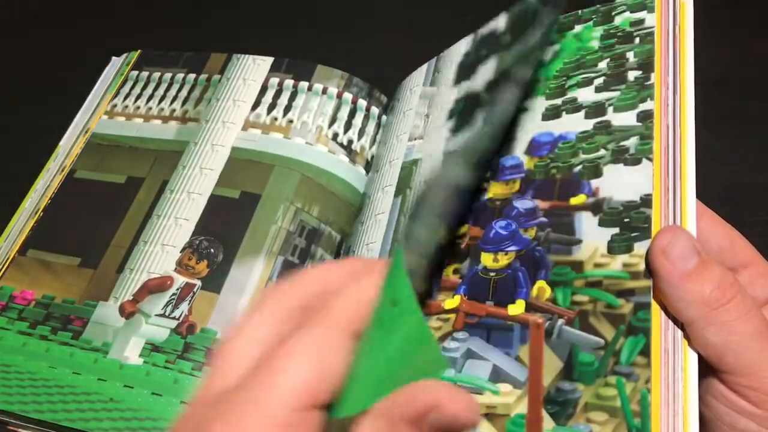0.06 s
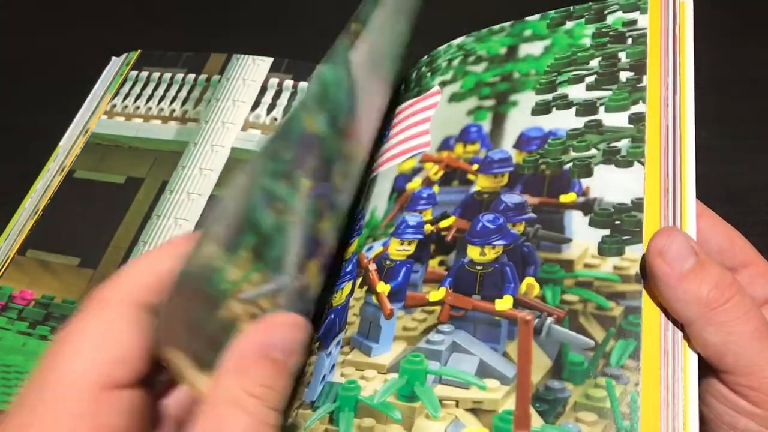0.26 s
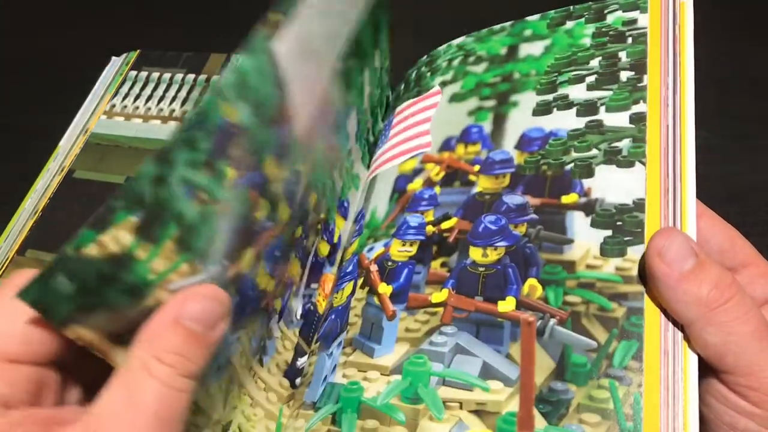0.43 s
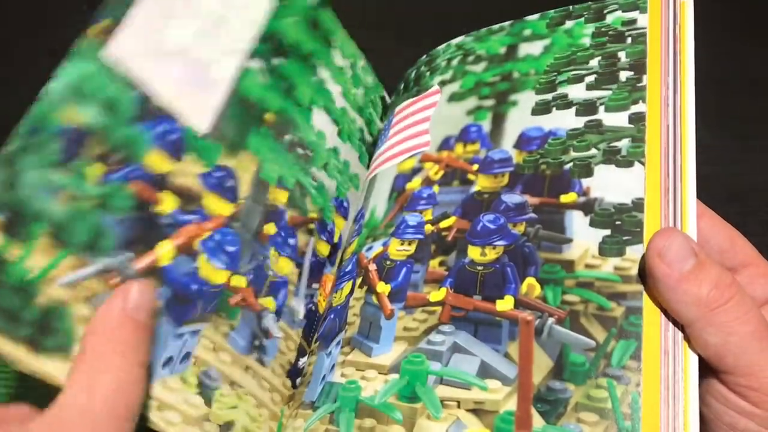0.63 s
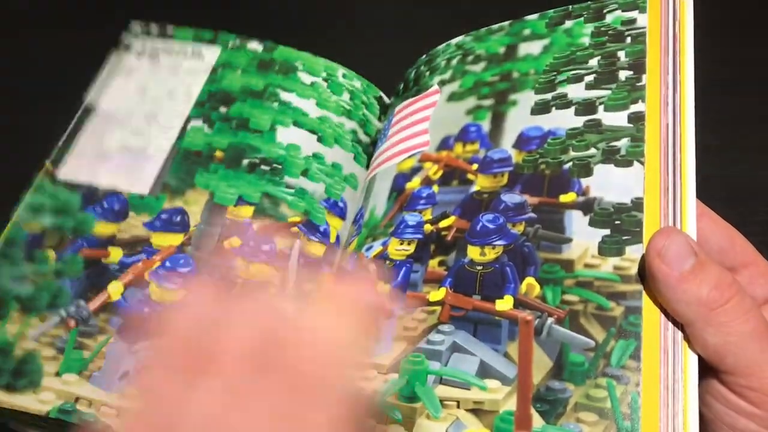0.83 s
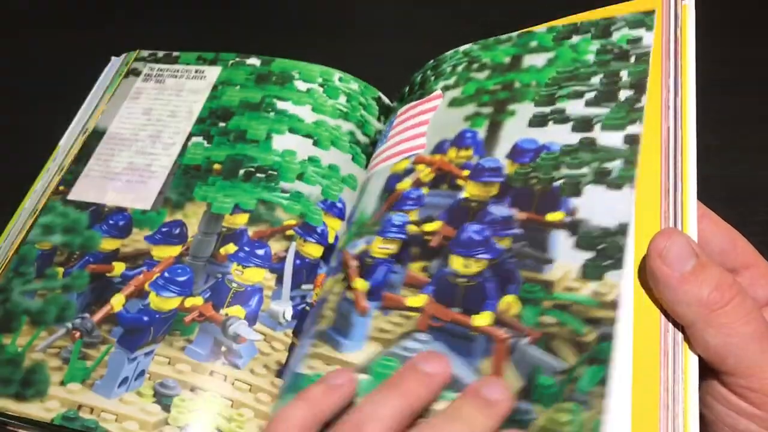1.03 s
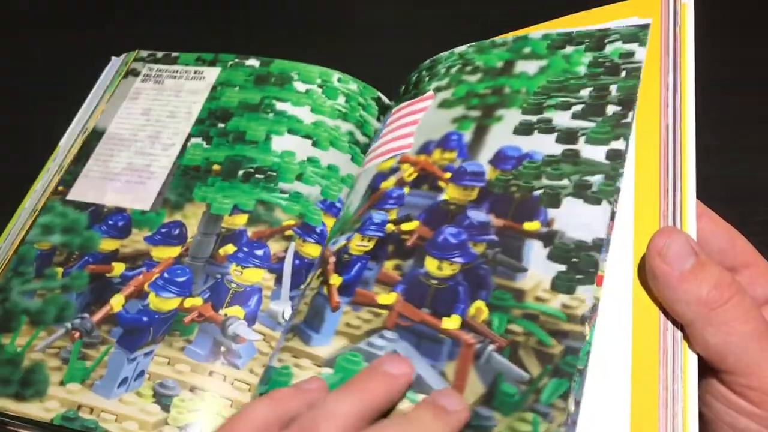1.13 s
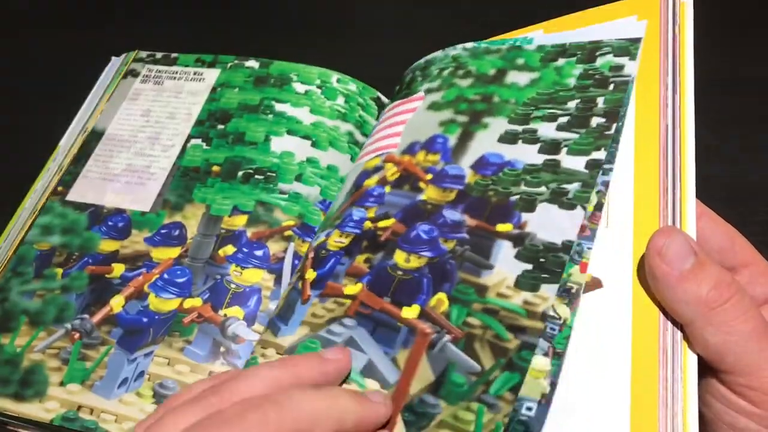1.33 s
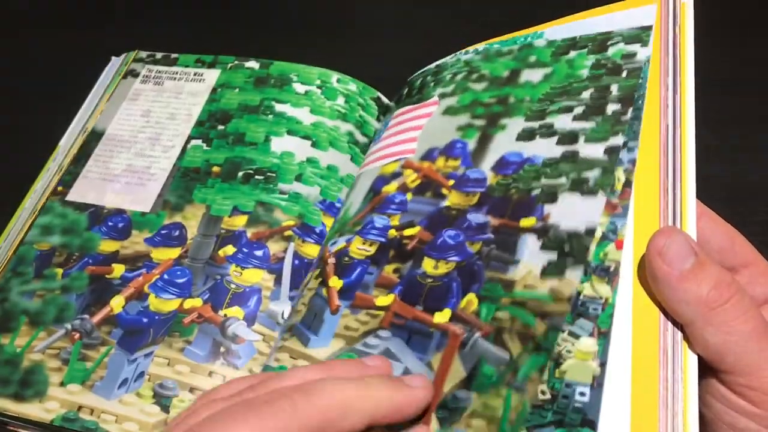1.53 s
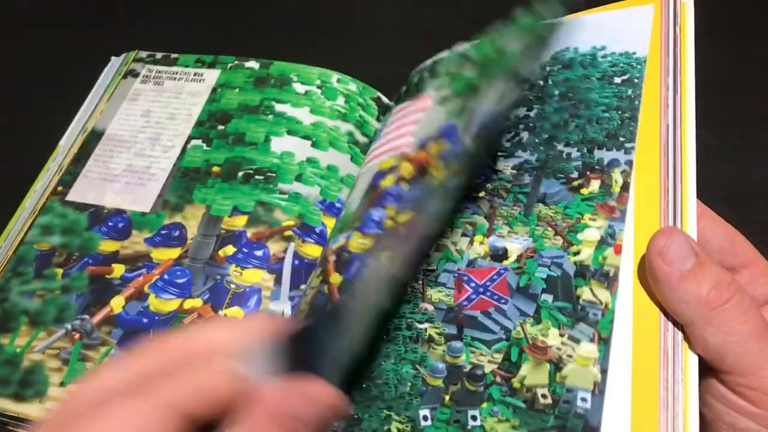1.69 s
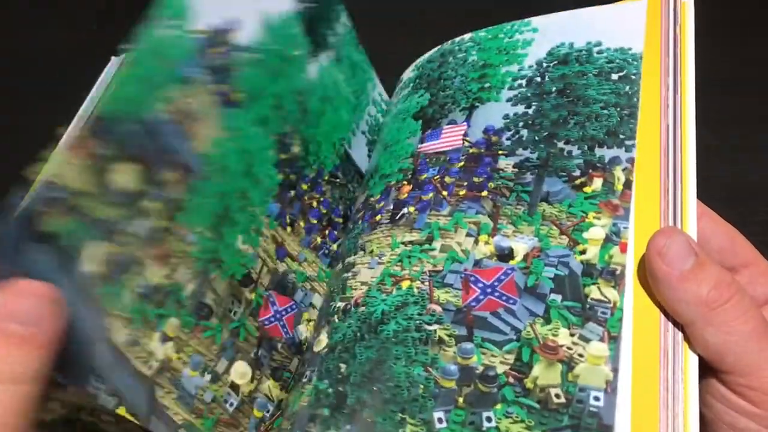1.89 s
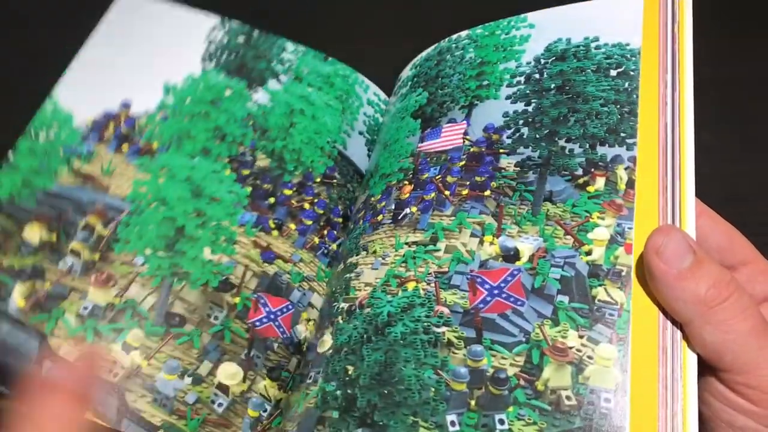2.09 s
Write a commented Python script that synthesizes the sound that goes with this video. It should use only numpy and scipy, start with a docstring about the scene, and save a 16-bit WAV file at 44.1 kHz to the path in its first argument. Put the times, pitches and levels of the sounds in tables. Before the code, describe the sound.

Book page turning close up: a crisp papery crack, hollow flutters, finger rubs, a soft second flick

```python
"""A faint papery hiss comes first, then a sharp snap: two glossy pages of a large book turned in a small room.
The first sheet slides up, snaps free, buckles with hollow pops and lands; fingers slide over the next page,
catch its edge and lift it with soft thumps, and it flicks over and wobbles.
Snaps, slides and air are shaped noise, pops are tones amid noise, thumps are low tones, and wobble is noise
through page resonances; a short room tail, faint steady noise and mains hum lie around them."""
import sys
import numpy as np
from scipy import signal
from scipy.fft import rfft, irfft, next_fast_len
from scipy.io import wavfile
from scipy.ndimage import uniform_filter1d, map_coordinates

SR = 44100
rng = np.random.default_rng(int(sys.argv[2]) if len(sys.argv) > 2 else 0)


def dump(signal):
    """Clip the signal to [-1, 1] and save it as 16-bit WAV at the path in sys.argv[1]."""
    limited = np.clip(np.atleast_2d(signal).T, -1, 1)
    pcm = np.round(limited * 32767).astype(np.int16)
    wavfile.write(sys.argv[1], SR, pcm)


N = 94815

# crisp snaps of the sheet: start_s, level_db, t60_s, bright_hz, tilt_db_per_octave
SNAPS = [(0.0176, -49.5, 0.026, 3310, 1.5), (.159, -48.5, 0.031, 1800, -0.5),
         (0.2166, -39, 0.034, 3700, -0.5), (0.2311, -23.5, 0.071, 2880, 3.5),
         (0.2356, -10, 0.0048, 6140, 9.5), (0.24, -22.5, 0.015, 6140, 6.5), (0.461, -48, 0.02, 5600, -3),
         (.481, -33, 0.012, 4350, -5.5), (0.502, -29, 0.0155, 3900, -2.5),
         (0.6375, -31.5, 0.0072, 2800, -2.5), (1.0082, -40.5, 0.003, 3400, -1),
         (1.9958, -36.5, 0.013, 2210, -2.5), (2.001, -46, 0.084, 2320, 1.5)]
# overall colour of a snap: freq_hz, gain_db
SNAP_COLOUR = [(100, 3.5), (600, -6.5), (1100, -1.5), (1700, 3), (3400, -1), (4700, -5), (5600, -1.5),
               (6700, -4), (7700, -13.5), (8900, -2), (10300, -10), (15500, -13)]
SNAP_RISE_S = 0.00054  # time constant of the swell before the crack
SNAP_PEAK_DB, SNAP_PEAK_OCTAVES = 8.5, 0.24  # bright band: boost before colouring, half width


def snaps():
    """Tension builds up and lets go in a broad crack with one bright band."""
    out = np.zeros(N)
    for start_s, level_db, t60_s, bright_hz, tilt_db in SNAPS:
        def bright_band(hz):
            octaves_away = np.log2((hz + 1) / bright_hz)
            return amp(SNAP_PEAK_DB * np.exp(-(octaves_away / SNAP_PEAK_OCTAVES) ** 2))

        t = clock() - start_s
        fall = np.where(t < 0, -t / SNAP_RISE_S, np.log(1000) * t / t60_s)
        envelope = np.exp(-np.minimum(fall, 20))
        crack = filtered(noise(), bright_band)
        out += amp(level_db) * envelope * coloured(crack, SNAP_COLOUR, tilt_db)
    return out


# hollow buckles of the sheet: start_s, level_db, pitch_hz, t60_s, crumple_db (relative to the tone)
POPS = [(0.238, -40, 277, 0.068, 4), (0.245, -21.5, 1940, 0.016, 6), (0.248, -23.5, 1983, 0.031, 2),
        (0.265, -45.5, 1880, 0.051, 13.5), (0.425, -49.5, 1498, 0.074, 6.5), (.430, -40.5, 815, 0.04, 5.5),
        (.480, -34, 680, 0.024, -6.5), (.5022, -24.5, 585.5, 0.059, -38), (0.5193, -40, 1146, 0.022, 9),
        (.525, -42.5, 710, 0.029, 3.5), (.532, -41, 864, 0.039, 5), (.558, -49, 630, .022, 7),
        (0.592, -53, 570, .03, -16), (0.699, -57, 851, .05, 9), (1.156, -46.5, 870, 0.067, -4.5),
        (1.851, -47, 632, 0.026, 0.5), (1.999, -50.5, 597, 0.045, 3.5), (2.063, -52.5, 713, 0.049, 5),
        (2.079, -47.5, 600, 0.08, -5)]
# spectrum of the crumple around each pop: pitch_multiple, gain_db
CRUMPLE = [(.1, -19.5), (.4, 3.5), (.7, 3.5), (1, 5.5), (1.45, 2), (2.2, -8), (5, -47.5)]
POP_RISE_S = 0.00096  # time constant


def pops():
    """Each buckle rings one damped bending mode amid a cluster of others."""
    out = np.zeros(N)
    for start_s, level_db, pitch_hz, t60_s, crumple_db in POPS:
        t, envelope = struck(start_s, POP_RISE_S, t60_s)
        tone = np.sqrt(2) * np.sin(2 * np.pi * pitch_hz * t)
        cluster = unit(filtered(noise(), lambda hz: amp(along(CRUMPLE, hz / pitch_hz))))
        out += amp(level_db) * envelope * (tone + amp(crumple_db) * cluster)
    return out


# soft thumps as a page lifts or lands: start_s, level_db (before doubling), pitch_hz, t60_s
THUMPS = [(0.502, -38, 158, 0.039), (1.689, -44.5, 254, 0.056), (1.6988, -32.5, 167, 0.021),
          (1.734, -31.5, 236, 0.017), (1.744, -29.5, 224, 0.014), (1.772, -49.5, 240, 0.054),
          (1.835, -46.5, 79, 0.053), (1.997, -51.5, 167, 0.044)]
THUMP_RISE_S = 0.0035  # time constant


def thumps():
    """The whole page flexes and pushes air in a short, low, damped tone."""
    out = np.zeros(N)
    for start_s, level_db, pitch_hz, t60_s in THUMPS:
        t, envelope = struck(start_s, THUMP_RISE_S, t60_s)
        out += 2 * amp(level_db) * envelope * np.sin(2 * np.pi * pitch_hz * t)
    return out


# paper and skin sliding: start_s, length_s, level_db (before roughness and resonance), rise_s,
# release_s (to fall 17 dB), tilt_db_per_octave
SLIDES = [(-.02, 0.29, -62.5, .01, 0.013, 0), (0.148, 0.14, -58.5, 0.003, 0.018, 2.5),
          (0.221, .006, -36.5, 0.0073, .005, 1), (.25, 0.056, -54, .005, 0.16, 0),
          (0.39, .012, -44.5, 0.014, 0.014, -6.5), (0.507, 0.043, -54.5, 0.0071, 0.042, -1),
          (0.624, 0.025, -53, 0.006, 0.017, 1.5), (0.705, 0.015, -63.5, 0.01, 0.011, 3.5),
          (1.006, .24, -55, 0.0045, 0.17, -0.5), (1.053, 0.059, -55, 0.048, 0.19, 6.5),
          (1.28, 0.068, -54, 0.021, 0.015, -3.5), (1.365, .026, -48.5, 0.01, 0.012, 1),
          (1.405, 0.027, -45.5, 0.022, 0.029, 0), (1.426, 0.2, -64, 0.0088, 0.049, 0.5),
          (1.514, 0.0193, -54.5, 0.012, 0.005, 2.5), (1.65, 0.16, -56.5, 0.061, 0.11, 0),
          (1.911, 0.198, -68.5, 0.018, 0.027, 1.5), (2.006, 0.025, -51, .008, 0.015, 7.5)]
# overall colour of the hiss: freq_hz, gain_db
SLIDE_COLOUR = [(200, -13.5), (450, -15.5), (700, -7.5), (1200, -7), (2400, -8), (3400, -8.5),
                (5000, -15.5), (6300, -15), (10400, -21.5), (13000, -17), (15800, -24)]
GRAINS_PER_S, GRAIN_SHARE = 2500, 0.27  # mean rate of slips, their share of the power before colouring
ROUGH_DB, ROUGH_PER_S = 0.5, 150  # random level drift: depth, new values per second


def slides():
    """Dense tiny slips under each stroke make a rough hiss."""
    out, t = np.zeros(N), clock()
    share = np.clip(GRAIN_SHARE, 0, 1)
    for start_s, length_s, level_db, rise_s, release_s, tilt_db in SLIDES:
        slips = unit(noise() * (rng.random(N) < GRAINS_PER_S / SR))
        mix = np.sqrt(share) * slips + np.sqrt(1 - share) * noise()
        hiss = coloured(mix, SLIDE_COLOUR, tilt_db)
        fade_in = np.clip((t - start_s) / rise_s, 0, 1)
        fade_out = np.exp(-2 * np.maximum(t - start_s - length_s, 0) / release_s)
        out += amp(level_db) * hiss * fade_in * fade_out
    drift = map_coordinates(rng.standard_normal(N // 20), [t * ROUGH_PER_S])
    return out * amp(ROUGH_DB * drift)


CRINKLE_DB = 2.5  # depth of the brief, narrow patches in the paper's hiss


def crinkled(x):
    """The hiss is mottled by brief, narrow random gains over time and frequency."""
    spectrum = signal.stft(x, nperseg=256)[2]
    field = rng.standard_normal(spectrum.shape)
    field = uniform_filter1d(field, size=4, axis=0)  # spread over frequency
    field = uniform_filter1d(field, size=2, axis=1)  # spread over time
    patches = unit(amp(CRINKLE_DB * unit(field)))
    return signal.istft(spectrum * patches, nperseg=256)[1][:N]


# the flat page's resonance under a rubbing finger
PRESSED_HZ, PRESSED_WIDTH_HZ, PRESSED_DB = 872.5, 46, 4.5


def rubbing():
    """The slides, mottled and coloured by the pressed page's damped mode."""
    def pressed_page(hz):
        return 1 + amp(PRESSED_DB) * resonance(hz, PRESSED_HZ, PRESSED_WIDTH_HZ)

    return filtered(crinkled(slides()), pressed_page)


# lasting resonances of the loose sheet: pitch_hz, width_hz, level_db
SHEET = [(264.8, 14, -2.5), (589.6, 33, 1), (657, 62, -4.5), (874, 27, -4.5)]


def sheet(x):
    """x through the page's damped modes, summed with alternating sign."""
    def modes(f):
        return sum((-1) ** k * amp(level_db) * resonance(f, pitch_hz, width_hz)
                   for k, (pitch_hz, width_hz, level_db) in enumerate(SHEET))

    return filtered(x, modes)


# how hard the loose sheet wobbles: time_s, level_db
WOBBLE = [(0, -85), (.3, -49.5), (.37, -62), (.46, -53.5), (.6, -65), (0.671, -53), (.75, -76),
          (1.0, -88.5), (1.018, -54), (1.12, -98), (1.157, -56.5), (1.26, -69.5), (1.32, -58),
          (1.39, -67.5), (1.48, -69.5), (1.66, -84.5), (1.85, -60), (1.94, -78), (2.07, -53), (2.15, -78)]


def wobble():
    """Handling keeps the sheet's resonances stirred: noise through them at a moving level."""
    level_db = np.interp(clock(), *np.transpose(WOBBLE))
    return amp(level_db) * unit(sheet(noise()))


# air pushed by the swinging page: middle_s, half_length_s (to 1/e), level_db
SWINGS = [(0.232, 0.32, -62), (1.937, 0.16, -70)]
# colour of the low whoosh: freq_hz, gain_db
AIR = [(40, -5.5), (370, -3.5), (550, -9), (2000, -35.5)]


def air():
    """The whoosh of low noise swells and fades with the speed of each swing."""
    speed = sum(amp(level_db) * np.exp(-((clock() - middle_s) / half_length_s) ** 2)
                for middle_s, half_length_s, level_db in SWINGS)
    return speed * coloured(noise(), AIR)


# decay of the room: freq_hz, t60_s
ROOM_DECAY = [(400, 0.27), (2500, 0.33), (6000, 0.26), (14000, 0.16)]
# colour and strength of the tail: freq_hz, gain_db
ROOM_COLOUR = [(100, -5.5), (600, -10), (2500, -14.5), (6000, -14), (14000, -14.5)]
ROOM_DELAY_S = 0.0049  # silence before the tail, and then the length of its fade-in


def room(x):
    """A short diffuse tail whose high treble dies first."""
    hz, t, spectrum = signal.stft(rng.standard_normal(SR // 2), SR, nperseg=256)
    decay = amp(-60 * t / along(ROOM_DECAY, hz)[:, None])
    tail = signal.istft(spectrum * decay, SR, nperseg=256)[1]
    tail = tail * np.clip(np.arange(len(tail)) / SR / ROOM_DELAY_S - 1, 0, 1)
    wet = signal.fftconvolve(x, tail / np.linalg.norm(tail))[:N]
    return filtered(wet, lambda f: amp(along(ROOM_COLOUR, f)))


# colour of the steady room noise: freq_hz, gain_db
FLOOR = [(30, -9), (52, 3), (75, -19), (104, -8.5), (130, -12.5), (450, -23), (10000, -38), (15500, -32.5)]
# mains hum: pitch_hz, level_db
HUM = [(50, -80.5), (100, -72.5)]
FLOOR_DB = -64.5


def room_tone():
    """Faint steady coloured noise, and mains hum as sines of random phase."""
    hum = sum(np.sqrt(2) * amp(level_db) * np.sin(2 * np.pi * (pitch_hz * clock() + rng.random()))
              for pitch_hz, level_db in HUM)
    return amp(FLOOR_DB) * coloured(noise(), FLOOR) + hum


def struck(start_s, rise_s, t60_s):
    """Time since a blow, and an envelope that rises and dies."""
    t = np.maximum(clock() - start_s, 0)
    rise = 1 - np.exp(-t / rise_s)
    return t, rise * amp(-60 * np.minimum(t / t60_s, 2))


def resonance(f, hz, width):
    """Response of one damped mode, 1 at its pitch."""
    return 1j * f * width / (hz * hz - f * f + 1j * f * width)


def coloured(x, points, tilt_db=0):
    """x with a spectrum and a tilt per octave (level below 220 Hz), at rms 1."""
    def colour(hz):
        return amp(along(points, hz) + tilt_db * np.log2(np.maximum(hz, SR / 200)))

    return unit(filtered(x, colour))


def filtered(x, response):
    """x times a response of frequency."""
    m = next_fast_len(N + SR // 2)  # spare room so that ringing does not wrap round
    return irfft(rfft(x, m) * response(np.fft.rfftfreq(m, 1 / SR)), m)[:N]


def along(points, hz):
    """Values at hz between (frequency, value) points on a log axis."""
    f, v = np.transpose(points)
    return np.interp(np.log(hz + 1e-6), np.log(f), v)


def noise():
    """White noise at rms 1."""
    return rng.standard_normal(N)


def clock():
    """Time of each sample in seconds."""
    return np.arange(N) / SR


def amp(db):
    """Decibels to amplitude."""
    return 10 ** (np.asarray(db) / 20)


def unit(x):
    """x scaled to rms 1."""
    return x / np.sqrt(np.mean(x ** 2) + 1e-20)


RING_DB = -16  # how strongly snaps and pops set the sheet ringing


def scene():
    """The book close by, in its room."""
    cracks, buckles = snaps(), pops()
    layers = [cracks, buckles, thumps() + rubbing()]
    in_room = sum(x + room(x) for x in layers)
    ring = amp(RING_DB) * sheet(cracks + buckles) + wobble()
    return (in_room + ring + air() + room_tone())[None]


LOW_CUT_HZ, TOP_HZ = 45, 15850


def record(dry):
    """Cuts the deep bass steeply and keeps nothing above the band limit."""
    def band(hz):
        low_cut = hz ** 4 / np.hypot(hz ** 4, LOW_CUT_HZ ** 4)
        return (hz < TOP_HZ) * low_cut

    return filtered(dry[0], band)[None]


dry = scene()
out = record(dry)
dump(out)
```